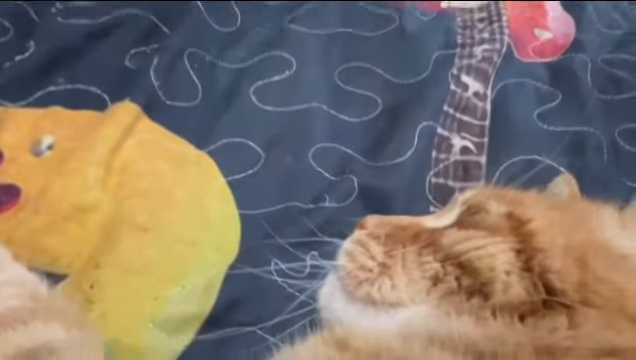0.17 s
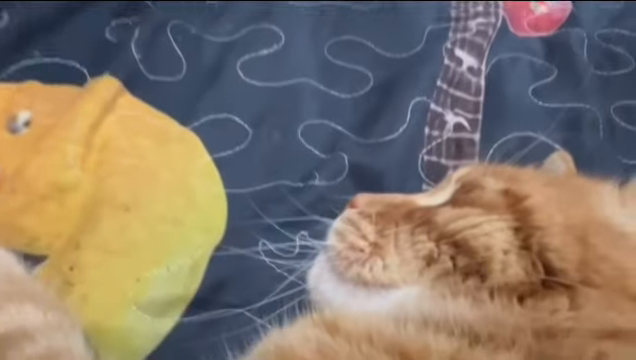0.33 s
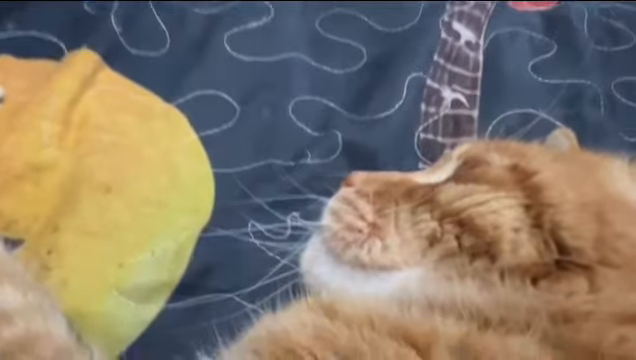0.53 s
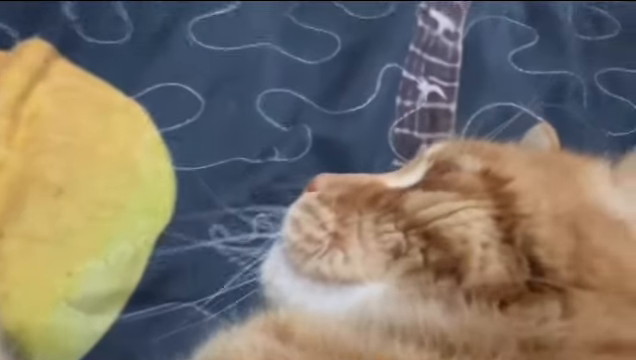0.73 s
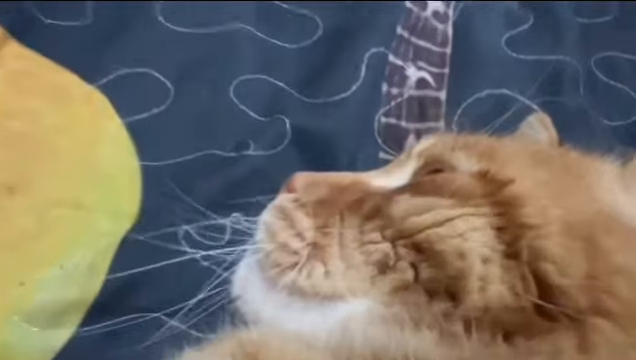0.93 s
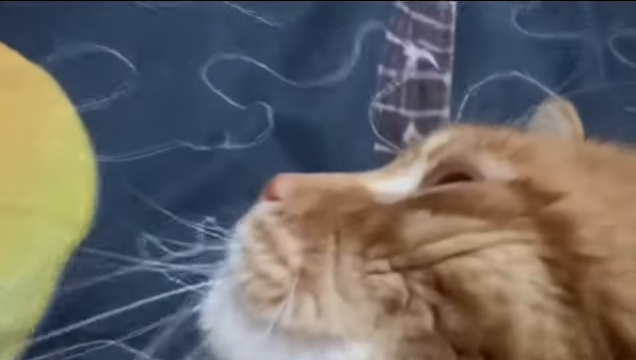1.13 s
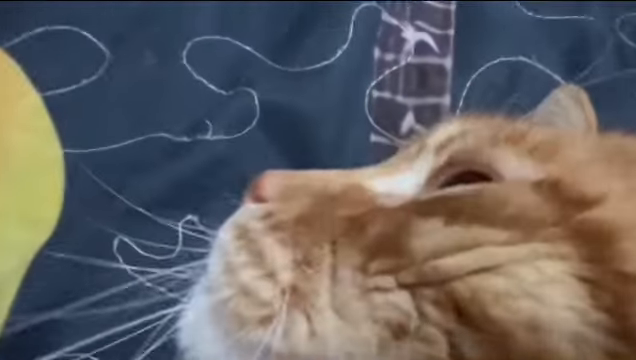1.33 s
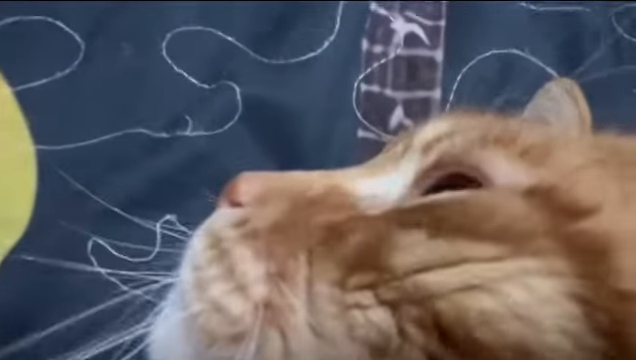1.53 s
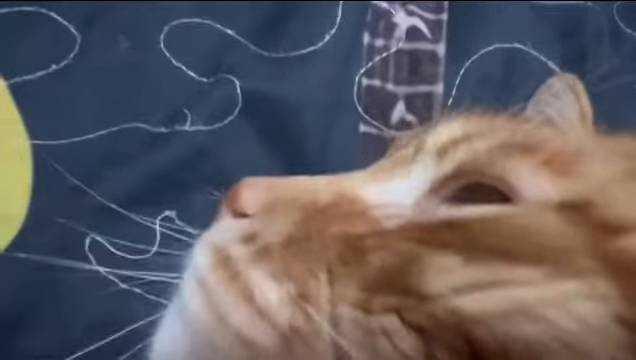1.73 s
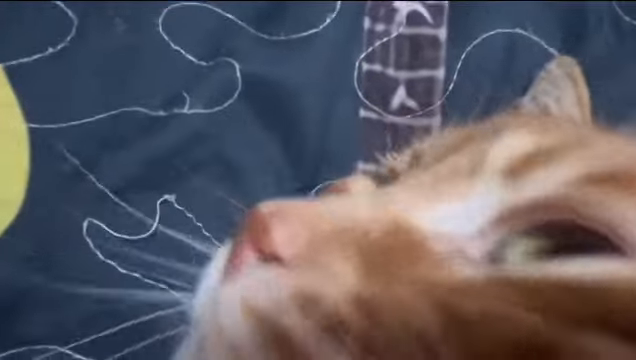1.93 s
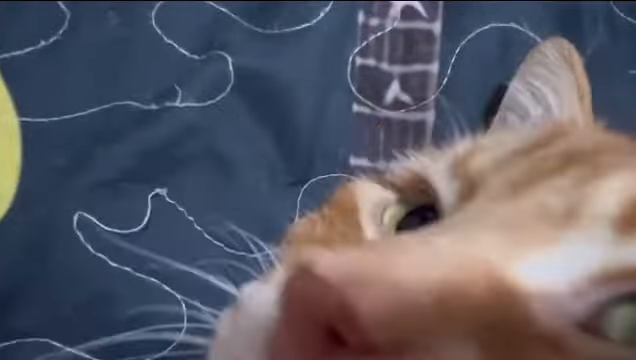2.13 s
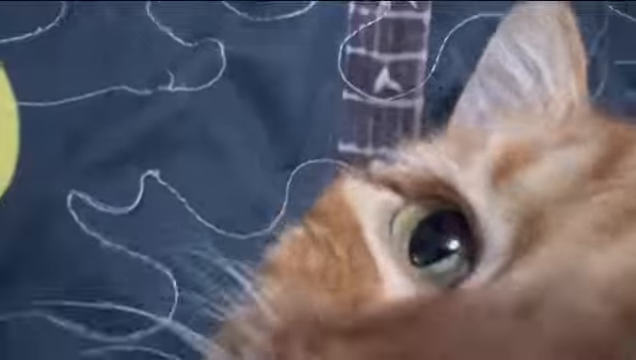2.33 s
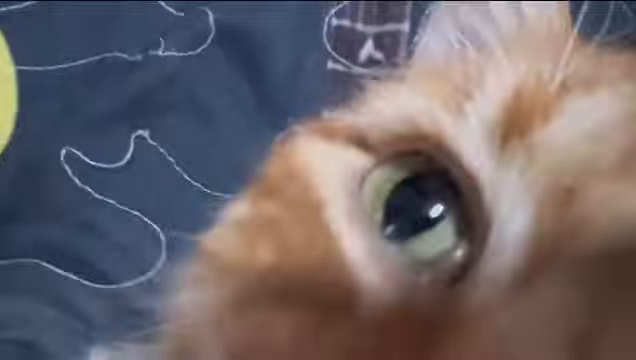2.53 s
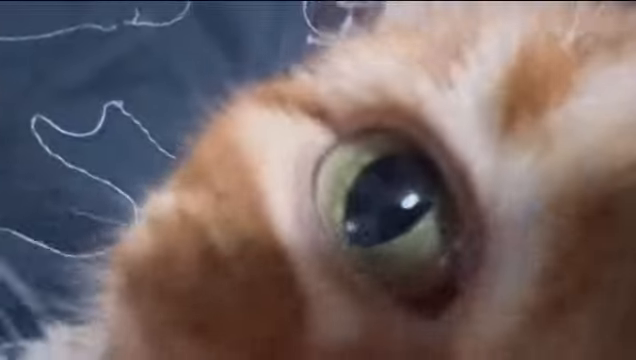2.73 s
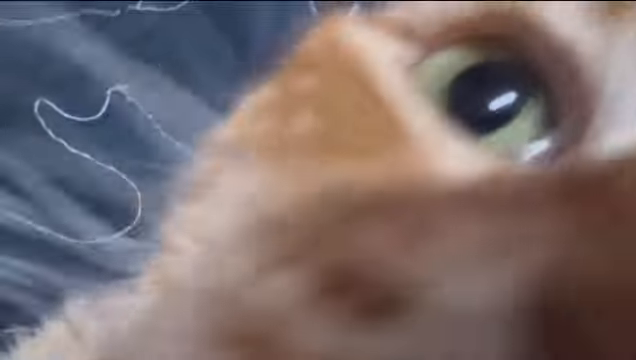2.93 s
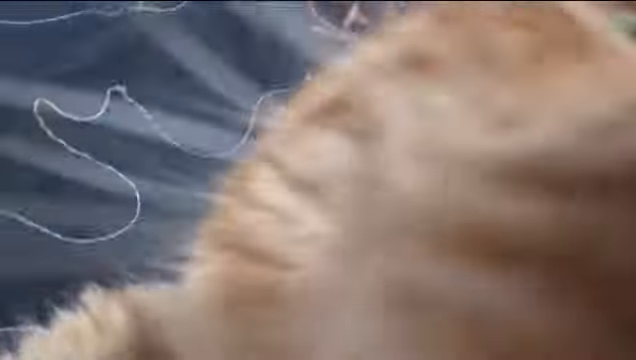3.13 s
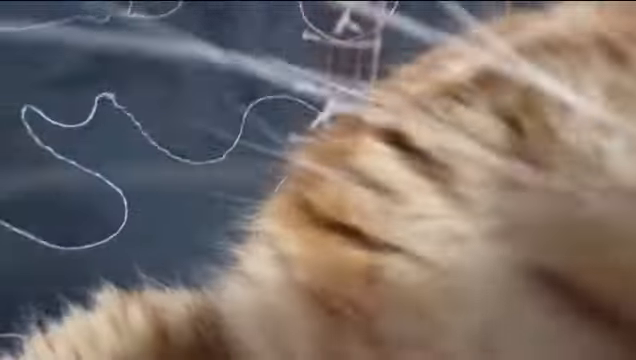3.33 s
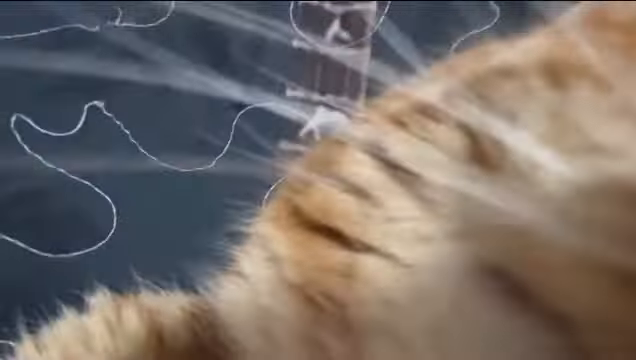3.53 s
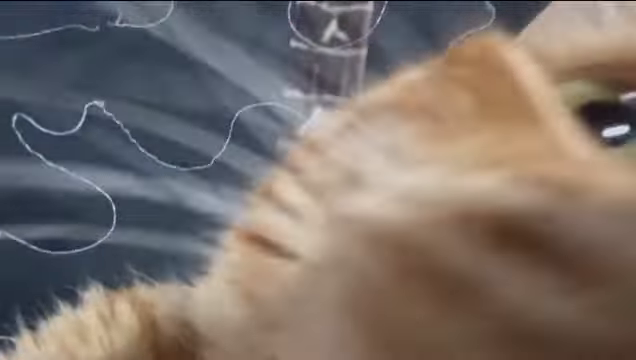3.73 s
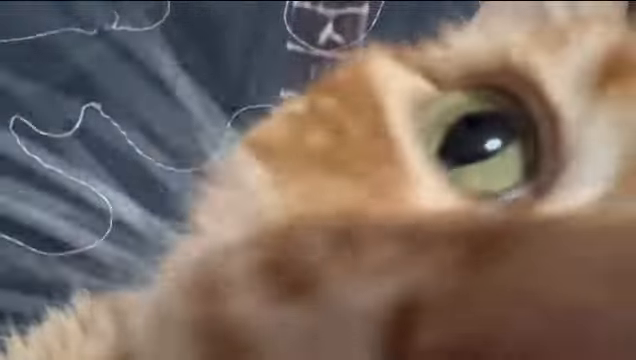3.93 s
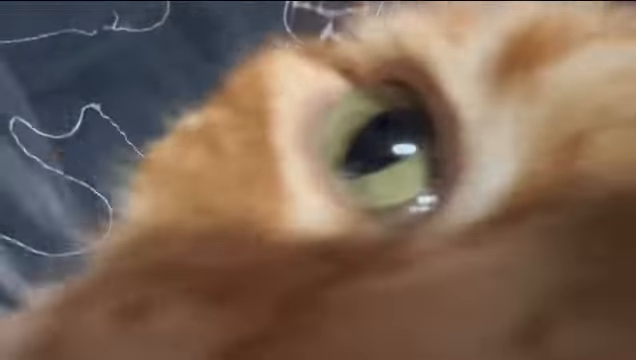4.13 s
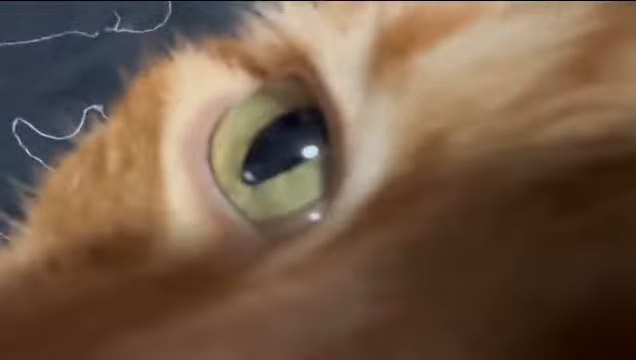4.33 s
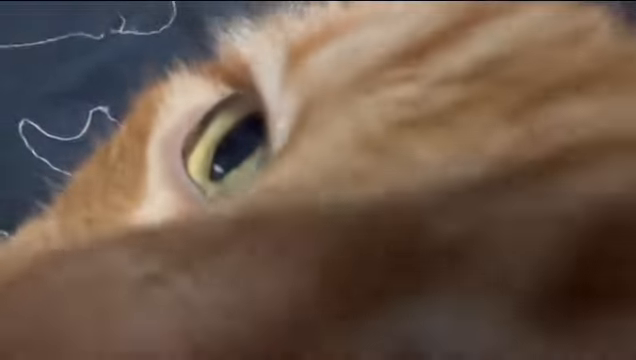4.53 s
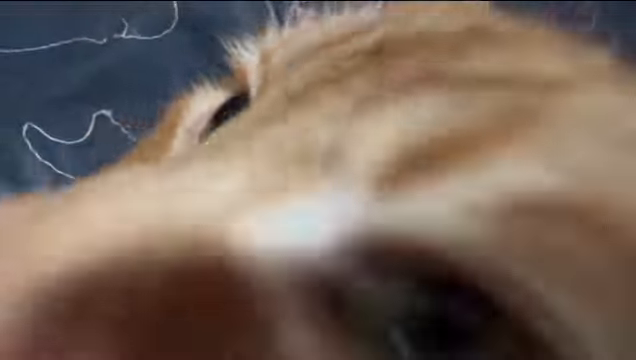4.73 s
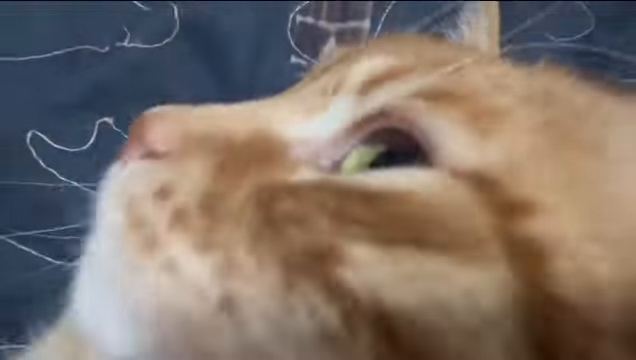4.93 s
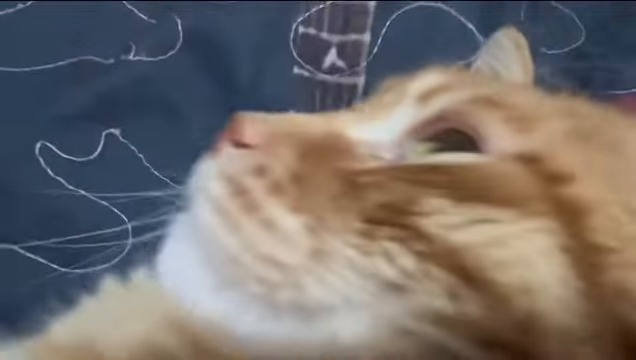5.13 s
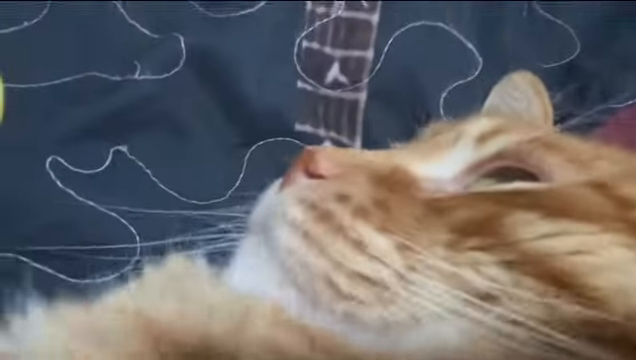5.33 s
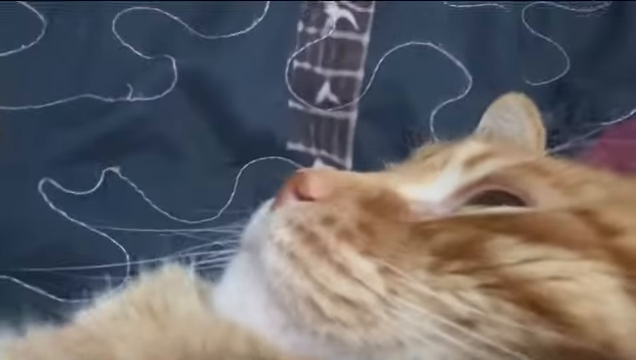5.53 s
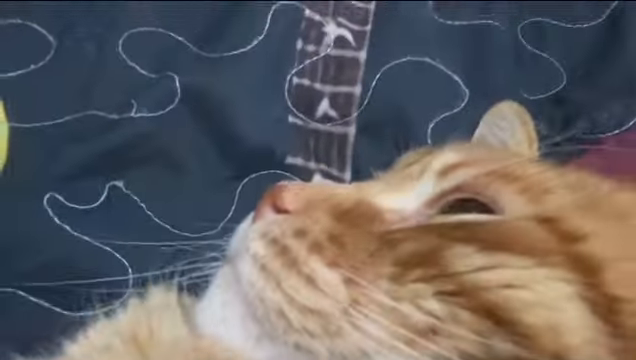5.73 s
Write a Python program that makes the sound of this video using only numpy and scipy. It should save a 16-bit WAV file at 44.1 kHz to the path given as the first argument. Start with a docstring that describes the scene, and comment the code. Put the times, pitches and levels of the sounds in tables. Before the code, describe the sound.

A cat purrs in a low, rapid rattle close to the microphone, sniffs it, then blows a booming breath across it.

```python
"""A purring cat close to a phone on a quilt: about 26 throat pulses a second, each a damped thud, rattle and ring.
It turns and noses the phone. Its sniffs and breaths are noise shaped by the nose and chopped by the purr;
their air buffets the microphone ports as low-passed noise, and the throat snaps open in short noise puffs.
Fur and cloth rustle as banded noise, which also gives the blow's unchopped tail; ticks are short decaying bursts.
Shaped noise makes the quiet room."""
import sys
import numpy as np
from scipy import signal
from scipy.fft import rfft, irfft, next_fast_len
from scipy.io import wavfile
from scipy.ndimage import uniform_filter1d, map_coordinates

SR = 44100
rng = np.random.default_rng(int(sys.argv[2]) if len(sys.argv) > 2 else 0)


def store_pcm(level_fs):
    """Save levels as 16-bit WAV."""
    pcm = np.round(np.clip(level_fs, -1, 1) * 32767).astype(np.int16)
    wavfile.write(sys.argv[1], SR, np.atleast_2d(pcm).T)


def undo_db(level):
    """Turn decibels back into plain size, where 20 dB means ten times bigger."""
    steps = np.asarray(level, float) / 20
    return 10 ** steps


N = 259749

# purr clock: (time [s], throat pulses so far [count])
PURR_CLOCK = [(-.03, 0), (.226, 7), (1.349, 37), (1.58, 43), (1.802, 49), (2.184, 59), (2.406, 65),
              (2.608, 70), (2.869, 77), (3.028, 81), (3.134, 84), (3.402, 91), (3.624, 97), (4.262, 113),
              (5.023, 133), (5.266, 139), (5.736, 151), (5.94, 156)]
# purr effort: (time [s], thud level [dB], chest ring above the thud [dB])
PURR_EFFORT = [(0, -58, -4), (.44, -64.5, 0), (.5, -64, -15), (.62, -63.5, -18), (.85, -57.5, -22),
               (1.24, -59, -5), (1.28, -80, -6), (1.35, -54, -1.5), (1.48, -50, -4), (1.84, -51, -2.5),
               (2.2, -43.5, 1), (2.36, -55, -2), (2.48, -32.5, -8), (2.58, -41, -1), (2.82, -50.5, 9.5),
               (2.91, -32, -8), (3.02, -38.5, -5), (3.5, -60, 7), (3.67, -55, -16), (3.89, -45, -6),
               (4.0, -47, -10.5), (4.16, -40, -11), (4.34, -55.5, 7.5), (4.46, -55, -3), (4.56, -53, 0.5),
               (4.92, -52, -13), (4.99, -58.5, -16), (5.09, -48, -4), (5.33, -54.5, -6), (5.5, -77, -12),
               (5.64, -75, -7), (5.86, -57.5, -9), (5.89, -64, -10)]
# head turning and nearing: (time [s], thud pitch [Hz], left over right [dB])
HEAD = [(0, 121, 3.5), (1.25, 137, 3.5), (1.4, 112.2, 5), (2.0, 125.7, 4.5), (2.5, 104.7, 5),
        (3.0, 102.5, 2), (3.7, 90.4, -1.5), (3.95, 97, -1.5), (4.35, 96, 11), (4.6, 115, 7),
        (5.0, 118.4, 3.5), (5.1, 131, 4), (5.89, 127, 5)]
# throat resonances, applied twice: (centre [Hz], width [Hz], gain [dB])
THROAT_MODES = [(123, 293, -1), (320, 91, -5.5)]
TURN_S = 1.3  # the breath reverses and the pulses change sign
CHEST_HZ, RATTLE_HZ = 47.7, 249.6
RATTLE_DB, RATTLE_WAVER_DB = -15.5, 4.5  # above the thud; slow chance swing

# sniffs in: (start [s], end [s], nose hiss [dB], nostril fizz [dB], port flutter [dB])
SNIFFS = [(1.95, 2.296, -63.5, -72, -47.5), (2.382, 2.661, -53.5, -71, -44.5),
          (2.732, 2.856, -72, -75.5, -63), (2.865, 2.997, -62, -77.5, -38.5),
          (3.676, 3.932, -58, -68, -55.5), (4.025, 4.244, -58, -84, -55.5)]
# quiet breaths: (start [s], length [s], nose hiss [dB], nostril fizz [dB], purr chop depth [dB])
BREATHS = [(0.884, 0.065, -84.5, -86, 10), (1.346, 0.66, -77, -88.5, 12), (4.294, 0.12, -75, -89, 2.5),
           (4.478, .09, -74, -97, 15)]
# long blow out, straight at the phone: (start [s], length [s])
BLOW_SPAN_S = (3.035, .58)
# where the throat shuts, ever earlier as the air runs out: (at blow start [cycle 0-1], at blow end [cycle 0-1])
BLOW_SHUTS = (.72, .5)
# upper nasal passages: (centre [Hz], width [Hz], gain [dB])
UPPER_NOSE_MODES = [(3300, 487, -2.5), (3725, 240, -2), (4170, 79, -14.5), (5720, 400, -16.5)]
# lower nasal passages: (centre [Hz], width [Hz], gain [dB])
LOWER_NOSE_MODES = [(962, 204, 1), (2346, 320, -3)]
# open nostril: (centre [Hz], width [Hz], gain [dB])
NOSTRIL_MODES = [(1690, 2050, -7.5), (3870, 1470, -6), (6900, 200, -20)]
# nostril fizz spectrum: (frequency [Hz], relative density [dB])
FIZZ_SPECTRUM = [(2650, -38), (4500, -7), (5310, -21), (6880, -0.5), (8120, -0.5), (9480, 2), (9880, 1),
                 (10300, -1), (11100, -2), (14000, -5), (15500, -22)]
# lead of the left port over the right, hiss: (frequency [Hz], phase [rad])
HISS_LEAD = [(300, -21.5), (950, 7.5), (1640, 1.5), (2930, 10.5), (5250, 13.5)]
# lead of the left port over the right, fizz: (frequency [Hz], phase [rad])
FIZZ_LEAD = [(4500, 2), (7670, -3), (11200, -5.5), (13400, -9), (15300, -4)]
SNIFF_EDGE_DB, SNIFF_SQUARE, SNIFF_PEAK = 35.5, 2.36, 0.47  # fall at the ends, squareness, place of the top 0-1
SNIFF_FLICKER_DB = 4  # chance swing of the fizz
CHOP_DB, CHOP_GROWS_DB_PER_S = 2, 3  # the purr chops the later sniffs deeper
BLOW_HISS_DB, BLOW_FIZZ_DB = -66, -63.5
BLOW_SAG_DB_PER_S, BLOW_SWELL_DB = 15, 12.5  # the fizz also swells with the gust
BLOW_ATTACK_S, BLOW_RELEASE_S, BLOW_FLICKER_DB = .05, .12, 1.5  # times per 60 dB

# throat snapping open, each puff 1.5 ms after its time: (time [s], relative level [dB])
SNAPS = [(2.068, -47), (2.183, -44), (2.405, -59), (2.446, -39), (2.464, -43), (2.485, -39), (2.524, -35),
         (2.564, -46.5), (2.605, -49), (2.865, -51), (2.896, -50.5), (2.931, -47), (3.744, -37),
         (3.782, -32), (3.821, -48), (3.864, -46.5), (4.126, -59), (4.49, -55.5), (4.53, -60)]

# air of the blow on the ports: (time [s], boom level [dB])
GUST = [(2.96, -97), (3.001, -46), (3.051, -23), (3.085, -20.5), (3.142, -12), (3.21, -22), (3.266, -32),
        (3.342, -40), (3.441, -38), (3.476, -51.5), (3.558, -49), (3.66, -90)]
# low boom spectrum: (frequency [Hz], relative density [dB])
BOOM_SPECTRUM = [(20, -41), (36, -17.5), (52, 5), (80, 3.5), (100, 3), (150, -4), (230, -8.5), (330, -72)]
# quicker flutter spectrum: (frequency [Hz], relative density [dB])
FLUTTER_SPECTRUM = [(88, -30.5), (150, -2.5), (182, -17.5), (238, 3.5), (449, -14.5), (619, -22),
                    (700, -38.5), (1200, -58), (1560, -88.5), (2640, -120)]
FLUTTER_DB, FLUTTER_GROWS = -5, 1.47  # above the boom at the gust's top; swings wider than the boom
THROB_DB, THROB_FIRST_DB, THROB_FADE_S = 4, 14, 0.14  # boom throb depth: lasting, extra at first, its fading

# faint airy whistles: (start [s], end [s], start pitch [Hz], end pitch [Hz], level [dB])
WISPS = [(4.24, 4.62, 4800, 4720, -90), (4.61, 4.7, 4250, 3950, -82), (4.58, 4.67, 6000, 6200, -86),
         (5.26, 5.38, 1290, 1250, -83), (5.53, 5.68, 1290, 1330, -90)]
# knocks of the face on the phone: (time [s], relative level [dB])
BUMPS = [(.832, -51.5), (2.464, -16.5)]
# phone body resonances, applied twice: (centre [Hz], width [Hz], gain [dB])
BODY_MODES = [(89, 57, 2.5), (288, 127, 1)]
# rubbing of fur on cloth, and at 3.244 s the unchopped hiss of the blow's tail:
# (start [s], length [s], grainy noise level [dB], fine noise level [dB])
RUBS_AND_BLOW_TAIL = [(0, 0.2, -79.5, -78), (0.219, 0.071, -72, -80.5), (0.337, 0.22, -81.5, -79.5),
                      (.9, .06, -80.5, -88), (1.0, 0.075, -91, -90), (3.244, 0.46, -72, -97),
                      (4.282, 0.38, -77.5, -95), (4.75, 0.38, -85.5, -99), (5.066, 0.19, -74, -83.5),
                      (5.64, 0.028, -78.5, -104), (5.746, 0.017, -98, -77.5)]
RUB_ATTACK_S, RUB_SAG_DB_PER_S, RUB_RELEASE_S = .05, 30, .3  # times per 60 dB
# ticks of whiskers and threads: (time [s], relative level [dB], centre [Hz], left over right [dB])
TICKS = [(0.2132, -45.5, 11800, -5), (0.2227, -50, 5070, 18), (0.5, -55.5, 4450, 31.5),
         (1.049, -47.5, 5800, 14), (1.843, -54, 3360, 8.5), (1.8653, -46.5, 13300, 4),
         (5.0655, -57, 1520, 4), (5.079, -45.5, 1620, -11), (5.1285, -52, 3600, 16),
         (5.287, -55, 13000, -6), (5.578, -60, 12500, 5), (5.6466, -52.5, 2150, 5), (5.7468, -48, 9800, 17)]
# room hush spectrum: (frequency [Hz], relative density [dB])
ROOM_SPECTRUM = [(15, -46.5), (25, -5), (101, -1), (133, -3), (378, -21), (684, -19.5), (782, -30.5),
                 (1270, -31), (1490, -37), (4870, -40), (7100, -47), (8130, -58.5), (9550, -49),
                 (12200, -50.5), (15500, -84.5)]
# room hush likeness of the channels: (frequency [Hz], left-right likeness [0-1])
ROOM_ALIKE = [(100, 0.74), (500, 0.073), (2500, 0), (11000, 0.17)]
ROOM_DB = -61
MIC_LOW_HZ = 41.7
MIC_NOTCH_HZ, MIC_NOTCH_WIDTH_HZ, MIC_NOTCH_DB = 8250, 600, -14  # the port cancels a narrow band


def unit(x):
    """Scaled to rms 1."""
    return x / np.sqrt(np.mean(x ** 2) + 1e-20)


def along(points, hz):
    """(Hz, value) points interpolated on a log axis."""
    f, v = np.transpose(points)
    return np.interp(np.log(hz + 1), np.log(f + 1), v)


def curves(rows, **ends):
    """One value per sample for each column after the time."""
    s, *cols = np.transpose(rows)
    return [np.interp(np.arange(N) / SR, s, c, **ends) for c in cols]


def filtered(x, response):
    """x times a complex response of frequency."""
    m = next_fast_len(N + SR // 2)
    return irfft(rfft(x, m) * response(np.fft.rfftfreq(m, 1 / SR)), m)[..., :N]


def modes(table):
    """Causal response of (Hz, width Hz, dB) resonances, summed with alternating sign."""
    def response(f):
        total = 0
        for k, (centre, width, db) in enumerate(table):
            damping = 1j * f * width
            total = total + (-1) ** k * undo_db(db) * damping / (centre ** 2 - f ** 2 + damping)
        return total
    return response


def wobble(rate):
    """A smooth random curve, rate knots a second."""
    knots = rng.standard_normal(int(N * rate / SR) + 4)
    return map_coordinates(knots, [np.arange(N) * rate / SR])


def pair(response, alike, lead=lambda hz: 0 * hz):
    """Stereo noise of rms 1 with a left-right likeness and a left phase lead at each frequency."""
    turn = lambda hz: np.arccos(np.clip(alike(hz), -1, 1)) / 2
    mid_side = lambda hz: response(hz) * [np.cos(turn(hz)), np.sin(turn(hz))]
    mid, side = filtered(rng.standard_normal((2, N)), mid_side)
    stereo = np.array([mid + side, mid - side])
    return unit(filtered(stereo, lambda hz: np.exp(.5j * np.outer([1, -1], lead(hz)))))


def pan(db):
    """Left and right gains for a left-over-right level."""
    return np.array([undo_db(db / 2), undo_db(-db / 2)])


def held(start_s, length_s, attack_s, sag_db_per_s, release_s):
    """Level in dB of a stroke that sets in, sags while held and lets go; attack and release per 60 dB."""
    t = np.arange(N) / SR - start_s
    attack = -60 * (-t / attack_s).clip(0)
    release = -60 * ((t - length_s) / release_s).clip(0)
    return attack - sag_db_per_s * t.clip(0) + release


def purr():
    """Each closing of the throat thuds, rattles and rings the chest; a breathy rumble fills the gaps."""
    thud_db, ring_db = curves(PURR_EFFORT)
    thud_hz, pan_db = curves(HEAD)
    at_s = beats(jitter_s=0.00083)
    beat_hz = thud_hz[(at_s * SR).astype(int).clip(0, N - 1)]
    thud = knocks(at_s, beat_hz, cycles=.62, scatter_db=1.2, late_s=.001)
    rattle = knocks(at_s, RATTLE_HZ + 0 * at_s, cycles=0.78, scatter_db=4.0, late_s=-0.00055)
    ring = knocks(at_s, CHEST_HZ + 0 * at_s, cycles=1.0, scatter_db=4.5, late_s=0.013)
    rattle_gain = undo_db(RATTLE_DB + RATTLE_WAVER_DB * wobble(5))
    pulses = thud + rattle_gain * rattle + undo_db(ring_db) * ring
    breathy = pair(lambda f: modes(THROAT_MODES)(f) ** 2, lambda f: 0.53 + 0 * f)
    return undo_db(thud_db) * (pan(pan_db) * pulses + undo_db(-19) * breathy)


def beats(jitter_s):
    """Times of the throat cycles, a little uneven."""
    s, count = np.transpose(PURR_CLOCK)
    total = int(count[-1])
    return np.interp(np.arange(total), count, s) + jitter_s * rng.standard_normal(total)


def knocks(at_s, hz, cycles, scatter_db, late_s):
    """A soft-starting damped swing at each time: it swells for the given cycles and dies; rms 1 in sum."""
    draw = rng.standard_normal((len(at_s), 2))
    hz = (hz * (1 + .05 * draw[:, 0]))[:, None]
    t = np.arange(SR // 10) / SR
    swell = t * hz / cycles
    swing = swell ** 2 * np.exp(2 * (1 - swell)) * np.cos(2 * np.pi * (hz * t - cycles + 0.075))
    size = undo_db(scatter_db * draw[:, 1]) * np.where(at_s < TURN_S, -1, 1)
    # one second of headroom lets early swings start before zero
    start = np.round((at_s + late_s - cycles / hz[:, 0] + 1) * SR).astype(int)
    index = start[:, None] + np.arange(len(t))
    summed = np.bincount(index.ravel(), (size[:, None] * swing).ravel(), N + 2 * SR)
    return unit(summed[SR:SR + N])


def sniffs():
    """Sniffs, breaths and the blow: chopped nose hiss near the left port, with fine nostril fizz."""
    upper, lower, wide = [pair(modes(m), lambda f: 0.61 + 0 * f, lambda f: along(HISS_LEAD, f))
                          for m in (UPPER_NOSE_MODES, LOWER_NOSE_MODES, NOSTRIL_MODES)]
    fizz = pair(lambda f: undo_db(along(FIZZ_SPECTRUM, f)), lambda f: 1 + 0 * f, lambda f: along(FIZZ_LEAD, f))
    grain, chance = undo_db(2.85 * wobble(150)), wobble(35)
    t = np.arange(N) / SR

    def air(shape_db, hiss_db, fizz_db, flicker_db, lower_db, nostril_db, pan_db):
        """One breath's mix of passages."""
        colour = upper + undo_db(lower_db) * lower + undo_db(nostril_db) * wide
        colour = colour / np.sqrt(1 + undo_db(2 * lower_db) + undo_db(2 * nostril_db))
        hiss = undo_db(hiss_db) * grain * pan(np.array([pan_db])) * colour
        return undo_db(shape_db) * (hiss + undo_db(fizz_db) * undo_db(flicker_db * chance) * fizz)

    drawn = sum(air(arch(start, end), hiss_db, fizz_db, SNIFF_FLICKER_DB, lower_db=2.5, nostril_db=-10, pan_db=15)
                for start, end, hiss_db, fizz_db, _ in SNIFFS)
    drawn_chop_db = CHOP_DB + CHOP_GROWS_DB_PER_S * (t - SNIFFS[1][0]).clip(0)

    quiet = 0
    for start, length, hiss_db, fizz_db, chop_db in BREATHS:
        shape_db = held(start, length, attack_s=0.095, sag_db_per_s=6.1, release_s=.25)
        breath = air(shape_db, hiss_db, fizz_db, 4.7, lower_db=-3.5, nostril_db=-9, pan_db=15)
        quiet = quiet + flow(0.66, chop_db, 1 - chop_db / 60) * breath

    start, length = BLOW_SPAN_S
    gust = undo_db(curves(GUST)[0] - np.max(np.transpose(GUST)[1]))
    shape_db = held(start, length, BLOW_ATTACK_S, BLOW_SAG_DB_PER_S, BLOW_RELEASE_S)
    fizz_db = BLOW_FIZZ_DB + BLOW_SWELL_DB * gust ** .5
    blown = air(shape_db, BLOW_HISS_DB, fizz_db, BLOW_FLICKER_DB, lower_db=12, nostril_db=15, pan_db=16.5)
    shuts = np.interp(t, [start, start + length], BLOW_SHUTS)
    return flow(.66, drawn_chop_db, .77) * drawn + quiet + flow(shuts - .28, 14, shuts) * blown


def arch(start_s, end_s):
    """Level in dB of one sniff: a flat-topped arch."""
    part = (np.arange(N) / SR - start_s) / (end_s - start_s) - SNIFF_PEAK
    away = np.where(part < 0, -part / SNIFF_PEAK, part / (1 - SNIFF_PEAK))
    return -SNIFF_EDGE_DB * away.clip(0, 2) ** SNIFF_SQUARE


def flow(place, swell_db, shuts):
    """Air flow per throat cycle: swells to a peak at place (0-1), drops 18 dB once the throat shuts."""
    cycle = curves(PURR_CLOCK)[0] % 1
    swell = undo_db(swell_db * (np.cos(2 * np.pi * (cycle - place)) - 1) / 2)
    shut = uniform_filter1d(1. * (cycle > shuts), size=90)
    return swell * undo_db(-18 * shut)


def snaps():
    """The throat snaps open: a short decaying noise puff through the nasal passages."""
    puffs, t = np.zeros(N), np.arange(150) / SR
    for s, db in SNAPS:
        puff = undo_db(-60 * t / 0.0049) * rng.standard_normal(len(t))
        puffs[round((s + .0015) * SR):][:len(t)] = undo_db(db + 12) * puff
    dull = lambda f: 1 / (1 + 1j * f / 4500) ** 2
    passages = modes([(600, 900, 3)] + LOWER_NOSE_MODES + UPPER_NOSE_MODES)
    return pan(np.array([11])) * filtered(puffs, lambda f: dull(f) * passages(f))


def blast():
    """Air on both ports: in each cycle a sharp flutter, then a lower one, then the boom."""
    boom_db, = curves(GUST, left=-120, right=-120)
    top_db = boom_db.max()
    blown = undo_db(top_db + FLUTTER_DB + FLUTTER_GROWS * (boom_db - top_db))
    drawn = undo_db(5.4 * wobble(25.01)) * sum(undo_db(db + 0.86 * arch(a, b)) for a, b, _, _, db in SNIFFS)
    since_blow_s = (np.arange(N) / SR - BLOW_SPAN_S[0]).clip(0)
    throb_db = THROB_DB + THROB_FIRST_DB * np.exp(-since_blow_s / THROB_FADE_S)
    cycles = curves(PURR_CLOCK)[0]
    dip = lambda place: (np.cos(2 * np.pi * (cycles - place)) - 1) / 2  # 0 at place, -1 half a cycle off
    flutter = lambda f: undo_db(along(FLUTTER_SPECTRUM, f))
    boom = undo_db(boom_db + throb_db * dip(.02)) * pair(lambda f: undo_db(along(BOOM_SPECTRUM, f)), lambda f: .97 + 0 * f)
    sharp = undo_db(18 * dip(.62)) * pair(lambda f: flutter(f) * (f > 370), lambda f: .88 + 0 * f)
    lower = undo_db(12 * dip(.8)) * pair(lambda f: flutter(f) * (f < 370), lambda f: .96 + 0 * f)
    return boom + (blown + drawn) * (lower + undo_db(-9.5) * sharp)


def wisps():
    """Thin gliding tones that fade in and out; unsteady air blurs their pitch."""
    out, t = np.zeros(N), np.arange(N) / SR
    for start, end, hz_from, hz_to, db in WISPS:
        part = np.clip((t - start) / (end - start), 0, 1)
        pitch_hz = (hz_from + (hz_to - hz_from) * part) * (1 + .018 * wobble(300))
        fade = np.sqrt(np.sin(np.pi * part).clip(0))
        out += undo_db(db + 4.6 * wobble(40)) * fade * np.sin(2 * np.pi * np.cumsum(pitch_hz) / SR)
    return pan(np.array([5])) * out


def bumps():
    """A soft push of the face: an impulse rings the phone's body."""
    blows = np.zeros(N)
    for s, db in BUMPS:
        blows[round(s * SR)] = undo_db(db + 38.5)
    return filtered(blows, lambda f: modes(BODY_MODES)(f) ** 2)


def rustle_and_blow_tail():
    """Fur rubbing on cloth, and the blow's unchopped tail: grainy and fine smooth banded noise."""
    grainy_band = modes([(1010, 780, 1.5), (3400, 2800, -5.0)])
    fine_band = modes([(11800, 3000, 1), (4900, 2500, -3)])
    grainy = undo_db(4.26 * wobble(200)) * pair(grainy_band, lambda f: 0.03 + 0 * f)
    grainy = pan(np.array([3])) * grainy
    fine = pair(lambda f: fine_band(f) ** 2 / (1 + (f / 13800) ** 30), lambda f: 0.13 + 0 * f)
    out = 0
    for s, length, grainy_db, fine_db in RUBS_AND_BLOW_TAIL:
        stroke = undo_db(held(s, length, RUB_ATTACK_S, RUB_SAG_DB_PER_S, RUB_RELEASE_S))
        out = out + stroke * (undo_db(grainy_db) * grainy + undo_db(fine_db) * fine)
    return out


def ticks():
    """Tiny dry snaps of whiskers and threads: a sine plus noise, 60 dB down in 5.5 ms."""
    out, t = np.zeros((2, N + 400)), np.arange(400) / SR
    for s, db, hz, pan_db in TICKS:
        burst = np.sin(2 * np.pi * hz * t) + 0.69 * rng.standard_normal((2, len(t)))
        snap = undo_db(-60 * t / 0.0055) * burst
        out[:, round(s * SR):][:, :len(t)] += undo_db(db - 10.5) * pan(np.array([pan_db])) * snap
    return out[:, :N]


def room():
    """Steady hush: shaped stereo noise, most alike between channels in the bass."""
    return undo_db(ROOM_DB) * pair(lambda f: undo_db(along(ROOM_SPECTRUM, f)), lambda f: along(ROOM_ALIKE, f))


def scene():
    """The cat, the cloth and the room's hush."""
    cat = purr() + sniffs() + snaps() + blast() + wisps()
    return cat + bumps() + rustle_and_blow_tail() + ticks() + room()


def top_cut(x):
    """Nothing passes above the cut-off."""
    return signal.sosfilt(signal.butter(12, 15730, fs=SR, output="sos"), x)


def record(dry):
    """The microphone drops the deepest bass and a narrow treble band."""
    notch = lambda f: undo_db(MIC_NOTCH_DB * np.exp(-((f - MIC_NOTCH_HZ) / MIC_NOTCH_WIDTH_HZ) ** 2))
    low_cut = lambda f: f ** 2 / np.sqrt(f ** 4 + MIC_LOW_HZ ** 4)
    heard = filtered(dry, lambda f: notch(f) * low_cut(f))
    return top_cut(heard)


dry = scene()
out = record(dry)
store_pcm(out)
```